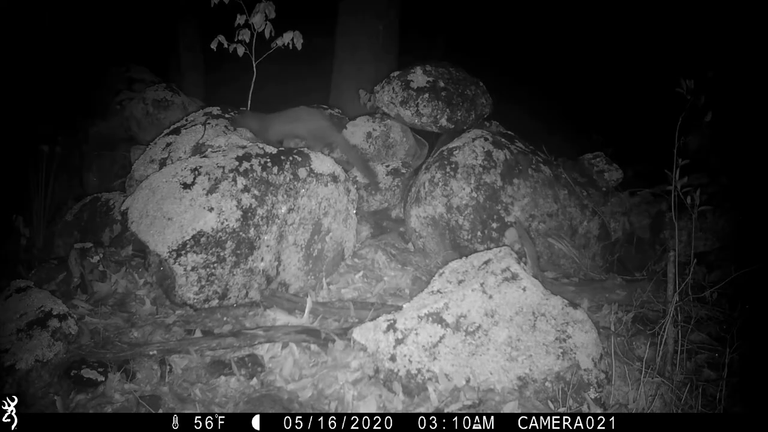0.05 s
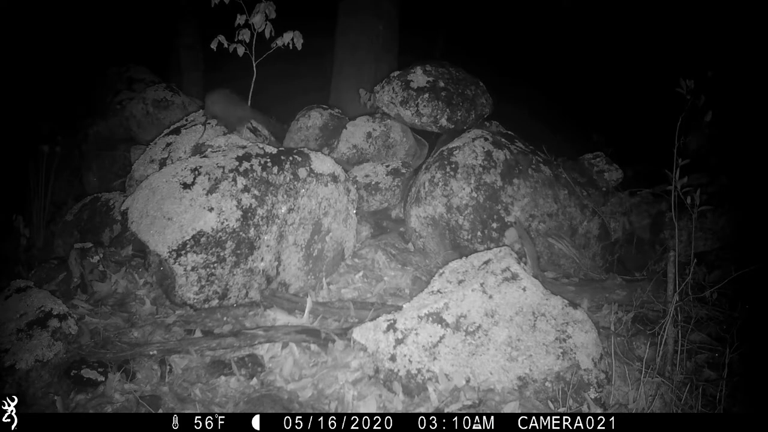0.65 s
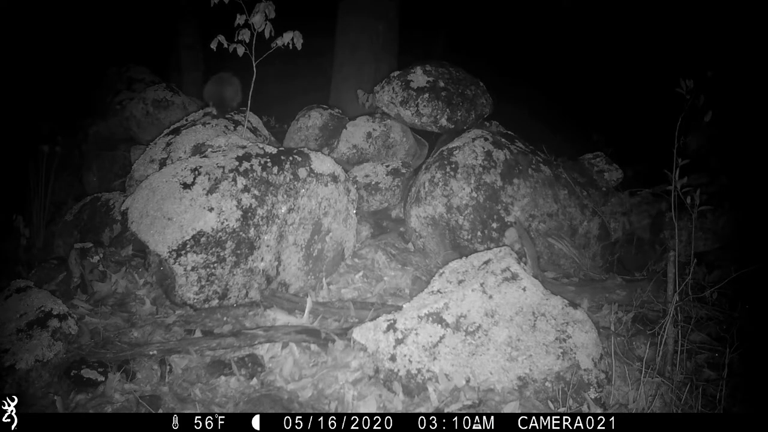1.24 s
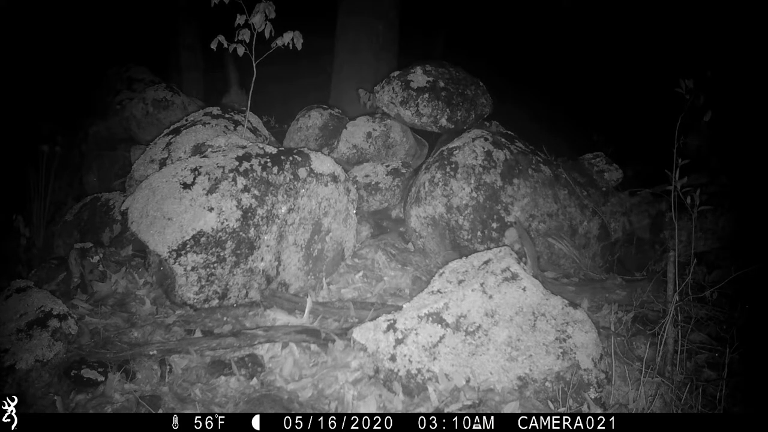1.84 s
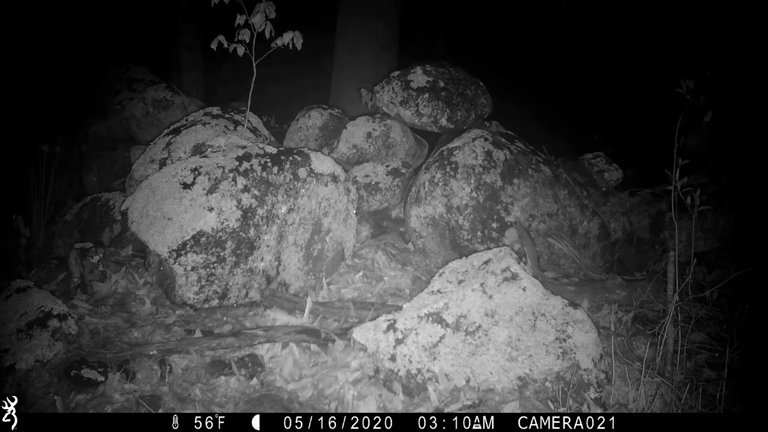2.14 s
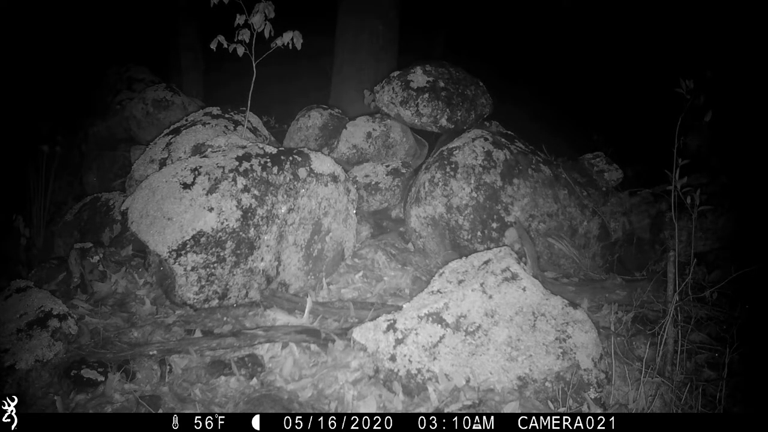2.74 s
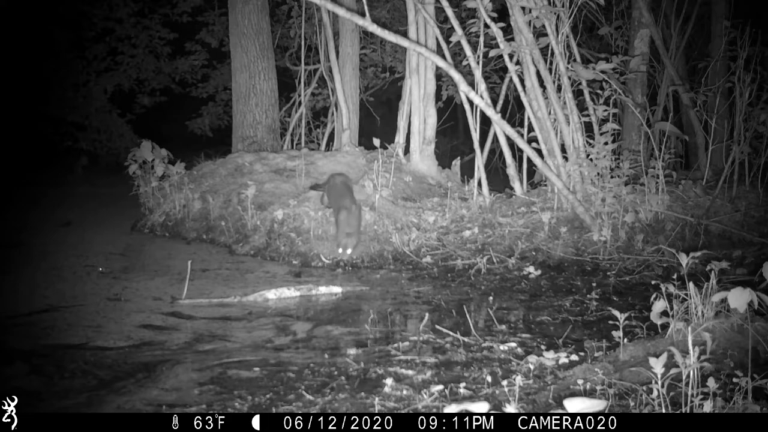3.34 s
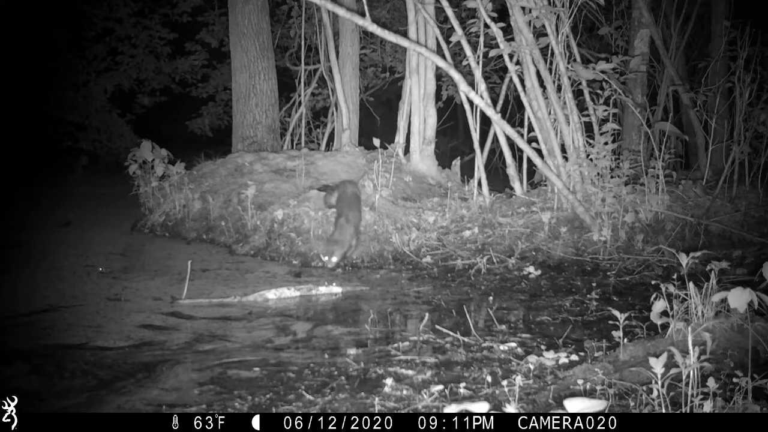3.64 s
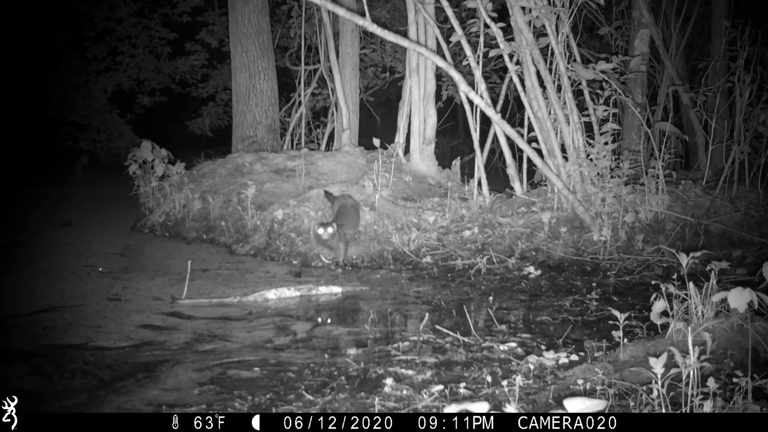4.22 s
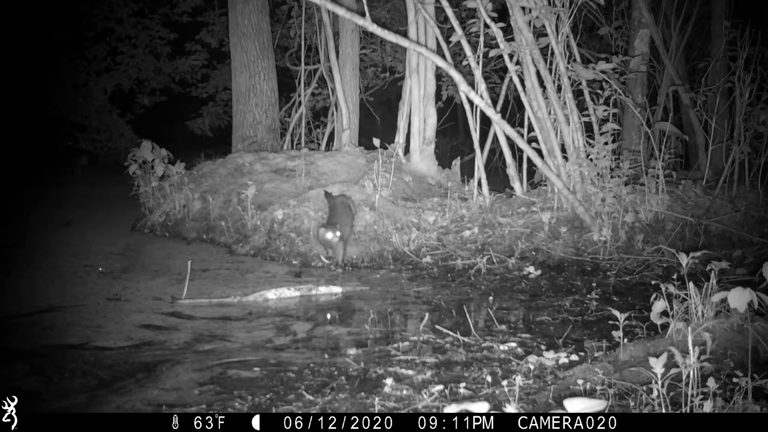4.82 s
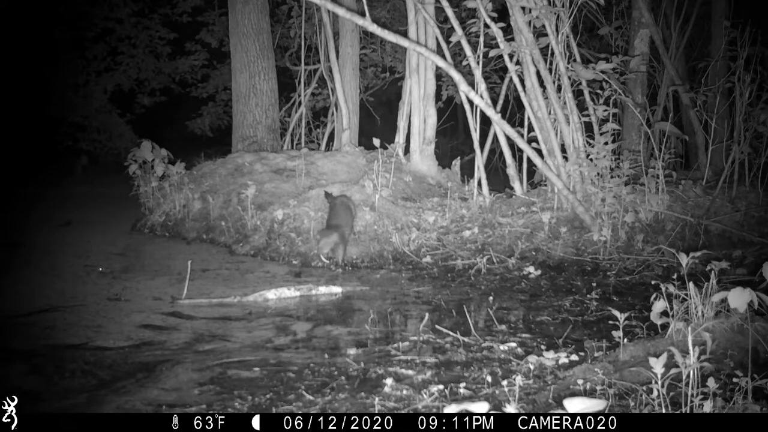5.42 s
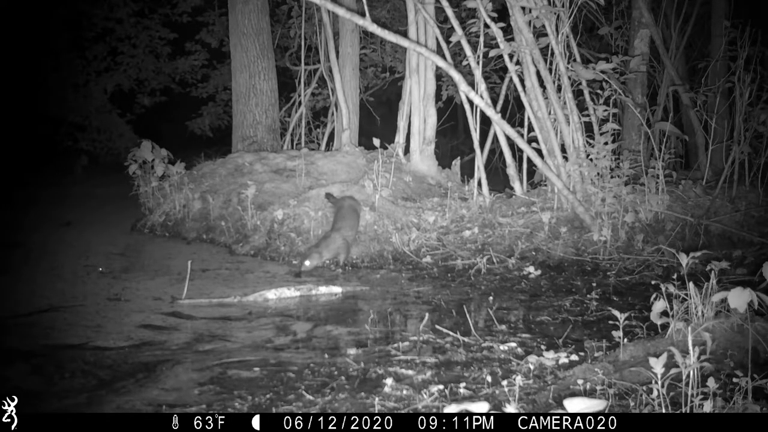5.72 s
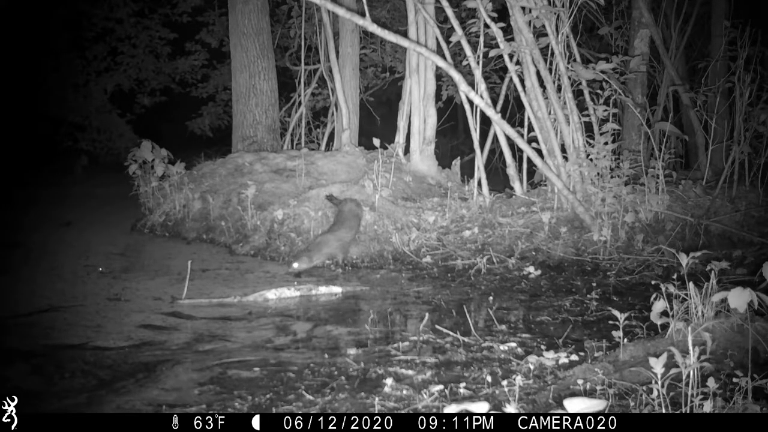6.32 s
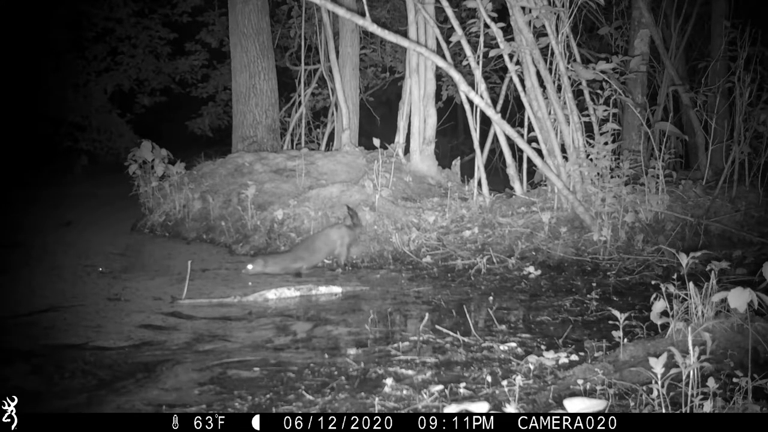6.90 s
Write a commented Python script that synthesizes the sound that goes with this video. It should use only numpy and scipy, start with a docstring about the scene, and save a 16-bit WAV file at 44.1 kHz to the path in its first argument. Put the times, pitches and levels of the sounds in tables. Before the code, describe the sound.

Faint leaf and twig ticks in a quiet night, then a sudden cut to treefrogs trilling in turn at a pond over a distant chorus.

```python
"""Dry leaves and twigs tick in a quiet night as a small animal moves off over a rock pile.
Then a hard cut leads to a wooded pond, where treefrogs trill in turn. Each trill is a train of short
rising pulses, about twenty a second, squeezed out by the frog's flanks and scattered by the trunks.
A distant chorus fills the gaps and an animal steps in the water. A trail camera whines faintly throughout.
"""
import sys
import numpy as np
from scipy import signal
from scipy.fft import rfft, irfft, next_fast_len
from scipy.io import wavfile
from scipy.ndimage import uniform_filter1d

SR = 44100
rng = np.random.default_rng(int(sys.argv[2]) if len(sys.argv) > 2 else 0)


def generate_wav(sig):
    """Save sig (samples, or channels by samples) to the path in sys.argv[1] as 16-bit PCM at SR."""
    pcm = np.round(np.clip(np.atleast_2d(sig).T, -1, 1) * 32767).astype(np.int16)
    wavfile.write(sys.argv[1], SR, pcm)


N = 306936
CUT_S = 2.8752   # the rock pile ends and the pond begins


def from_db(db):
    """Turn decibels into a number to multiply by."""
    return 10 ** (np.asarray(db) / 20)


def add(out, start_s, sound):
    """Mix a sound in at the given time."""
    at = int(np.clip(round(start_s * SR), 0, N))
    out[at:at + len(sound)] += sound[:N - at]


def band(x, low_hz, high_hz, order=1):
    """Keep mainly what lies between two frequencies."""
    edges = np.clip([low_hz, high_hz], [10, 20], [.44 * SR, .45 * SR])
    return signal.sosfilt(signal.butter(order, edges, "band", fs=SR, output="sos"), x)


def colour(x, spectrum):
    """Turn frequencies up or down by a table of f/Hz, gain/dB."""
    hz, db = np.transpose(spectrum)
    size = next_fast_len(N + SR // 10)
    bins_hz = np.maximum(np.fft.rfftfreq(size, 1 / SR), 1)
    gain = from_db(np.interp(np.log(bins_hz), np.log(hz), db))
    return irfft(rfft(x, size) * gain, size)[:N]


def noise(spectrum):
    """Steady noise of the given colour, with an average (rms) size of 1."""
    x = colour(rng.standard_normal(N), spectrum)
    return x / x.std()


def woods(x, t60, first_s=0.0049, echoes_per_s=1500):
    """Echoes off trunks and leaves; t60 is the seconds they take to fade by 60 dB."""
    t = np.arange(SR) / SR
    echoes = rng.standard_normal(SR) * (rng.random(SR) < echoes_per_s / SR)
    echoes *= (t > first_s) * from_db(-60 * t / t60)
    return signal.fftconvolve(x, echoes / np.linalg.norm(echoes))[:N]


# The hush of each place: f/Hz, relative level/dB
ROCKS_HUSH = [(18, -43), (30, -23.5), (166, -12), (307, -7), (480, -4), (850, 0), (1500, -1), (2300, -5.5),
              (2900, -7.5), (3350, -2.5), (3800, -11.5), (5000, -20.5), (7000, -30), (10000, -41.5)]
POND_HUSH = [(30, -15.5), (70, -7.5), (145, -2.5), (255, -2), (290, 4.5), (330, -2), (700, 4), (1400, 6.5),
             (2600, -2.5), (3400, -14), (4600, -21.3), (5300, -30.5), (7000, -42), (10000, -45)]

def night_air(at_pond):
    """A soft, steady hush, louder at the pond."""
    return from_db(-46) * noise(POND_HUSH) if at_pond else from_db(-51) * noise(ROCKS_HUSH)


def whine(hz=7796.5, frames_per_s=29.7):
    """The camera's electronics sing one thin note whose wave flips over twice a frame."""
    t = np.arange(N) / SR
    flips = np.sign(np.sin(2 * np.pi * frames_per_s * t))
    return np.sin(2 * np.pi * hz * t) * uniform_filter1d(flips, size=24)


def camera(x, top_hz=11300):
    """The trail camera loses the highest treble."""
    return signal.sosfilt(signal.cheby2(14, 50, top_hz, fs=SR, output="sos"), x)


# A chorus far behind the rocks swells and fades: t/s, level/dB
CHORUS_SWELL = [(0, -55.5), (.3, -57), (.6, -64), (1.5, -66), (1.8, -56.5), (2.25, -56), (2.6, -61),
                (2.87, -60)]

def distant_chorus():
    """Frogs so far off that only their strongest tone is left, blurred into a narrow band."""
    blur = band(rng.standard_normal(N), 1770, 2160, order=2)
    level_db = np.interp(np.arange(N) / SR, *np.transpose(CHORUS_SWELL))
    return blur / blur.std() * from_db(level_db)


# The colour of the chorus at the pond: f/Hz, relative level/dB
CHORUS_COLOUR = [(700, -40), (880, -12.5), (1000, -11.5), (1200, -8.5), (1400, -18.5), (1700, -13),
                 (1950, -3.5), (2250, 2.5), (2430, -12), (2650, -24.5), (2900, -38.5), (3300, -27.5),
                 (3900, -69)]

def pond_chorus():
    """Many far frogs blur into two bands of noise."""
    return from_db(-36) * noise(CHORUS_COLOUR)


# Steps in shallow water: t/s, bubble level/dB, typical bubble f/Hz
WATER_STEPS = [(4.427, -42, 493), (4.512, -52.5, 502), (4.552, -53.5, 443)]

def water_steps(spray_db=10, spray_t60=0.25, bubble_t60=0.079, spread_s=.03, rise_per_s=1.2, bubbles=6):
    """A paw throws a little spray and pushes a few bubbles under; the trees echo it."""
    t, out = np.arange(SR // 4) / SR, np.zeros(N)
    for s, level_db, hz in WATER_STEPS:
        spray = band(rng.standard_normal(len(t)), 800, 2300, order=3)
        add(out, s, from_db(level_db + spray_db - 60 * t / spray_t60) * spray)
        for delay, pitch in rng.random((bubbles, 2)):
            bubble = np.sin(2 * np.pi * hz * (.8 + .55 * pitch) * t * (1 + rise_per_s * t))
            loudness = from_db(level_db - 60 * t / bubble_t60) * (1 - np.exp(-t / 0.0013))
            add(out, s + delay * spread_s, loudness * bubble)
    return out + woods(out, t60=0.24)


def footfall(start_s=.5487, level_db=-35, hz=480, t60=0.014):
    """A padded paw gives one short, dull knock on the rocks."""
    t, out = np.arange(SR // 20) / SR, np.zeros(N)
    knock = band(np.sin(2 * np.pi * hz * t), 210, 1400, order=2)
    add(out, start_s, from_db(level_db - 60 * t / t60) * knock)
    return out


def tick(hz, crumble_db=-21, crumble_t60=0.019, width=1.66):
    """A dry snap and the brief crumbling after it, dulled by the small microphone."""
    t = np.arange(SR // 25) / SR
    force = from_db(crumble_db - 60 * t / crumble_t60) * rng.standard_normal(len(t))
    force[0] += 1   # the snap itself
    snap = band(force, hz / width, hz * width)
    dulled = band(snap, 570, 3610, order=4) + from_db(-19.5) * band(snap, 4800, 8500, order=3)
    return dulled / np.abs(dulled).max()


# The clearest ticks of dry leaves and twigs: t/s, relative level/dB, centre f/Hz
LITTER_TICKS = [(0.088, -31, 1950), (0.172, -31, 2190), (0.22, -32, 1950), (0.235, -11, 1700),
                (0.28, -31, 2000), (0.449, -33, 2280), (0.548, -26, 1990), (0.552, -38, 1780),
                (0.612, -28, 2800), (0.7, -32, 1700), (0.836, -29, 3210), (0.922, -34, 2370),
                (1.003, -31, 2990), (1.402, -30, 2090), (1.526, -23, 2100), (1.531, -25, 2150),
                (1.545, -31, 1960), (1.618, -26, 2360), (1.627, -33, 2480), (1.765, -29, 1890),
                (1.771, -34, 1770), (1.814, -32, 2270), (2.053, -28, 2070), (2.247, -33, 1750),
                (2.342, -29, 3100), (2.35, -30, 1990), (2.728, -33, 1700), (2.755, -31, 1760),
                (2.817, -33, 2900)]

def leaf_litter(twig_above_db=-20, faint_db=-46, faint_hz=4800, octaves_per_db=.07, faint_ticks=140):
    """Twigs snap cleanly, leaves crumble; fainter ticks lie between, the smaller the brighter."""
    out = np.zeros(N)
    for s, level_db, hz in LITTER_TICKS:
        if level_db > twig_above_db:
            add(out, s, from_db(level_db - 2) * tick(hz, crumble_db=-33, width=1.55))
        else:
            add(out, s, from_db(level_db - .3) * tick(hz, crumble_db=-18))
    for when, size, brightness in rng.random((faint_ticks, 3)):
        level_db = min(faint_db - 3.8 * np.log(1 - size), -35)   # most are tiny
        hz = faint_hz * 2 ** (brightness - .5 - octaves_per_db * (level_db - faint_db))
        add(out, when * CUT_S, from_db(level_db) * tick(hz))
    return out


def trill(first_s, last_s, count, hz, level_db, start_db=-7, build_s=0.027, end_db=0, hurry=0):
    """A frog's effort builds, then may let go on the last pulse. Gives rows of t/s, level/dB, f/Hz."""
    settle_pulses, semitones_per_db = 3.5, .15
    k = np.arange(int(round(count)))
    gaps = 1 - hurry * np.exp(-k[:-1] / settle_pulses)   # a hurried start settles to a steady beat
    gaps[-1] += .12   # the tiring frog waits longer before its last pulse
    times = first_s + (last_s - first_s) * np.append(0, np.cumsum(gaps)) / gaps.sum()
    effort_db = start_db * np.exp((first_s - times) / build_s) + end_db * (k == k[-1])
    level_wobble, pitch_wobble = rng.standard_normal((len(k), 2)).T
    levels = level_db + effort_db + .3 * level_wobble
    pitches = hz * 2 ** (semitones_per_db * effort_db / 12)   # a weaker squeeze gives a lower note
    return np.column_stack([times, levels, pitches * (1 + .004 * pitch_wobble)])


def frog(pulses, shape, partials, waver_db=2.12, rasp_db=-60, sweep=1, growth=0.98):
    """Each squeeze of the flanks is a pulse: pitch climbs with pressure, then the voice box snaps shut."""
    t, out = np.arange(-.03, .03, 1 / SR), np.zeros(N)
    shape_s, semitones, shape_db = np.transpose(shape)
    glide = 2 ** (sweep * np.interp(t, shape_s, semitones) / 12)
    usual_db = np.median(pulses[:, 1])
    for s, level_db, hz in pulses:
        phase = 2 * np.pi * np.cumsum(hz * glide) / SR
        stretch = from_db(.3 * (level_db - usual_db))   # a weak pulse is also shorter
        uneven_db = shape_db + rng.normal(0, waver_db, len(shape_s))
        swell = np.interp(t, shape_s * stretch, from_db(uneven_db), 0, 0)
        swell = np.abs(uniform_filter1d(swell, size=70))
        tone = 0
        for multiple, db, delay_s in partials:
            # the higher a partial, the more it keeps to the top of the swell
            loudness = np.interp(t - delay_s, t, swell) ** ((multiple / 2) ** growth)
            tone += from_db(db) * loudness * np.sin(round(multiple) * phase)
        rasp = from_db(rasp_db) * swell * band(rng.standard_normal(len(t)), 3800, 7300, order=3)
        add(out, s + t[0], from_db(level_db) * (tone + rasp))
    return out


# Trills of a close frog, its rival and one across the pond: first t/s, last t/s, pulses, f/Hz,
# relative level/dB, weak start/dB, build-up/s, weak last pulse/dB, hurry at the start (0-1)
NEAR_CALL = (2.8725, 3.4885, 13, 1102, -10.9, -6.3, .06, -.3, .075)
RIVAL_CALL = (5.1682, 5.9559, 17, 1011, -13.5, -15, .03, -6.5, .09)
ACROSS_CALLS = [(3.3726, 3.886, 11, 1040, -26.8, -2, .12, -.3, .027),
                (6.229, 6.732, 11, 1039, -27.4, -2.5, .06, -2.5, .125)]
# Trills farther off: first t/s, last t/s, pulses, f/Hz, relative level/dB, share of the pitch sweep
FAR_CALLS = [(3.523, 4.26, 16, 1100, -37.5, 1), (4.344, 4.974, 13, 1012, -21.8, .8),
             (5.396, 6.087, 13, 1135, -30.5, .9), (6.145, 6.805, 14, 1065, -21.8, .9),
             (6.83, 6.935, 3, 1065, -27, .9)]
# The shape of one pulse: t/s from its middle, pitch shift/semitones, relative level/dB
NEAR_PULSE = [(-.018, -3.4, -30), (-.012, -2.3, -12), (-.008, -1.5, -3), (-.003, -.7, 0), (.001, 0, -1),
              (.005, 1.1, 1.5), (.008, 1.9, -10), (.012, 2.3, -35)]
RIVAL_PULSE = [(-.014, -2.5, -36.5), (-.008, -1.56, -11.5), (-.003, -0.25, 0.5), (.001, 0.26, 0),
               (.005, 1.5, -7), (.008, 3, -17), (0.014, 2.2, -37)]
ACROSS_PULSE = [(-.019, -2.5, -26.5), (-.012, -2.0, -6.5), (-.005, -0.61, -4), (.001, -0.29, 1.5),
                (.005, 2.36, -4.5), (.008, 0.5, -10.5), (0.011, 1.5, -36.5)]
# Partials, the pure tones in a voice; the throat sac favours the second:
# multiple of the pitch, relative level/dB, delay/s
NEAR_VOICE = [(1, -14.5, 0.0026), (2, 1.5, -0.00055), (3, -25, -0.0013), (4, -45, 0), (7, -56.5, -.001)]
RIVAL_VOICE = [(1, -14.3, 0.0025), (2, -.2, 0.00029), (3, -27.5, 0.0005), (4, -49, 0.002), (7, -63.5, 0)]
ACROSS_VOICE = [(1, -3, 0.0015), (2, 7, -0.00099), (3, -10, 0), (4, -27, 0), (5, -37, 0), (7, -46, 0)]
FAR_VOICE = [(1, -12.7, 0.0025), (2, 2.5, 0), (3, -23, 0.00082), (4, -54.5, 0.0076)]
# Resonances, the steady peaks that the upper partials slide through: f/Hz, gain/dB
VOICE_RESONANCES = [(900, -2), (1200, 3), (1650, 3), (2450, 0), (2800, -8), (3150, 1), (3450, 0),
                    (3800, -9), (4100, -3), (4450, -1), (4750, -11), (5300, -6), (7000, -6), (7500, 0),
                    (8000, -12)]

def treefrogs():
    """Frogs trill around the pond; the two close ones sound fairly dry, the distant ones echo more."""
    near = frog(trill(*NEAR_CALL), NEAR_PULSE, NEAR_VOICE, waver_db=1.3, rasp_db=-54, sweep=.98)
    rival = frog(trill(*RIVAL_CALL), RIVAL_PULSE, RIVAL_VOICE,
                 waver_db=0, rasp_db=-52, sweep=1.05, growth=.85)
    across = sum(frog(trill(*call), ACROSS_PULSE, ACROSS_VOICE, waver_db=1.2, rasp_db=-32)
                 for call in ACROSS_CALLS)
    far = sum(frog(trill(*call), RIVAL_PULSE, FAR_VOICE, sweep=sweep) for *call, sweep in FAR_CALLS)
    direct = from_db(-2.77) * near + from_db(0.16) * rival + from_db(-2.2) * across + from_db(-8.5) * far
    echoes = from_db(-10.5) * woods(near, t60=0.41) + from_db(-12.5) * woods(rival, t60=1.0)
    echoes += from_db(-4) * woods(across, t60=0.48) + from_db(0.1) * woods(far, t60=0.37)
    return colour(direct + echoes, VOICE_RESONANCES)


def scene():
    """The rock pile, then a hard cut to the pond in the middle of a frog's pulse."""
    rocks = night_air(at_pond=False) + distant_chorus() + leaf_litter() + footfall()
    rocks += from_db(-65) * whine()
    pond = pond_chorus() + treefrogs() + water_steps() + night_air(at_pond=True)
    pond += from_db(-80) * whine()
    return np.where(np.arange(N) / SR < CUT_S, camera(rocks), camera(pond))[None]


def record(dry, top_hz=17500):
    """Add a trace of even hiss, louder at the pond, and cut the very top."""
    hiss_db = np.where(np.arange(N) / SR < CUT_S, -97, -87)
    hiss = from_db(hiss_db) * rng.standard_normal(N)
    return signal.sosfilt(signal.cheby2(12, 70, top_hz, fs=SR, output="sos"), dry + hiss)


dry = scene()
out = record(dry)
generate_wav(out)
```